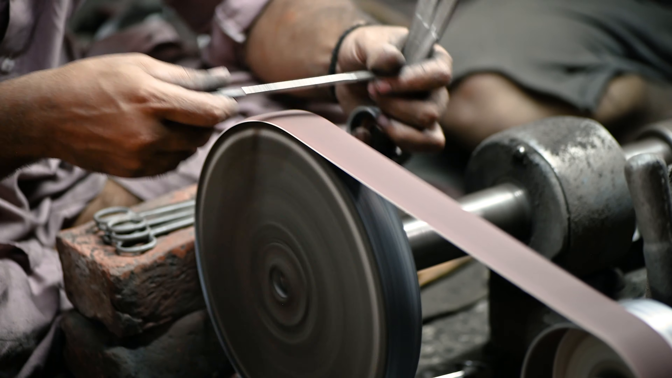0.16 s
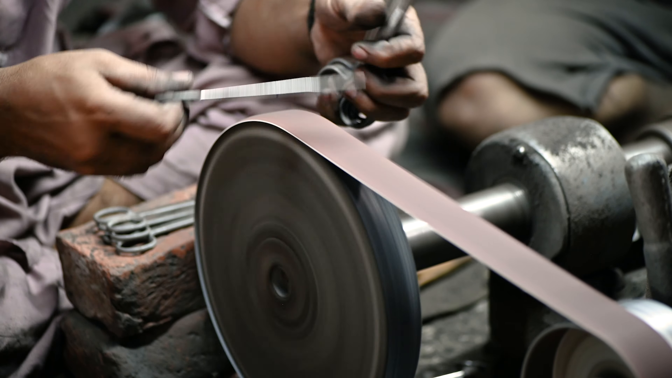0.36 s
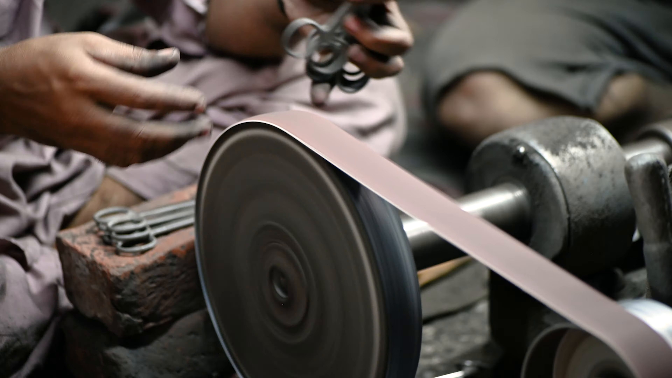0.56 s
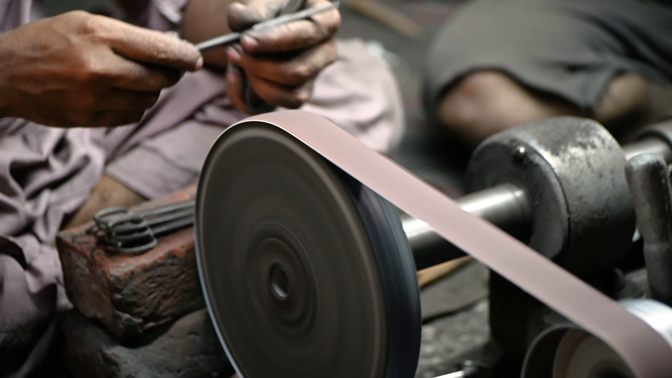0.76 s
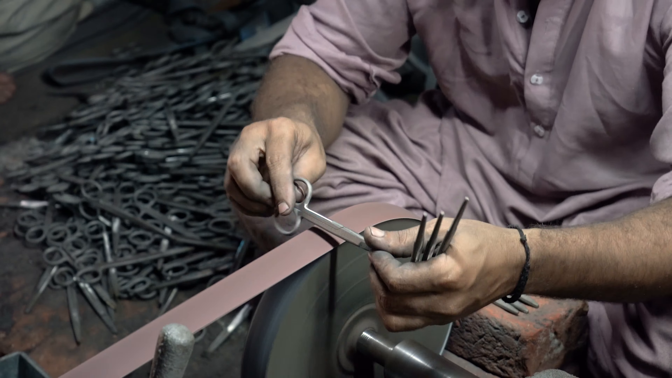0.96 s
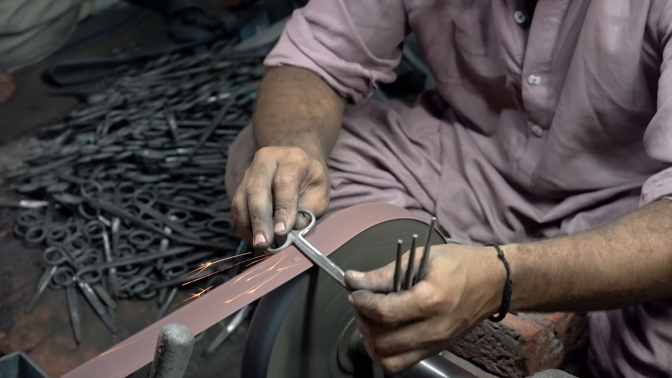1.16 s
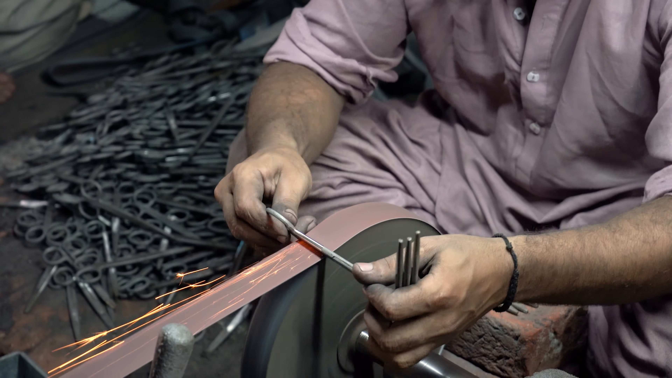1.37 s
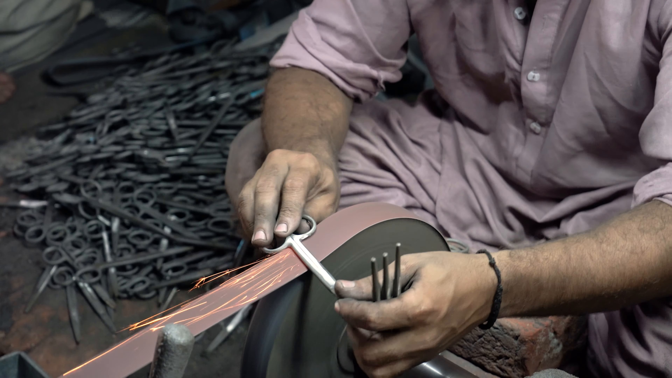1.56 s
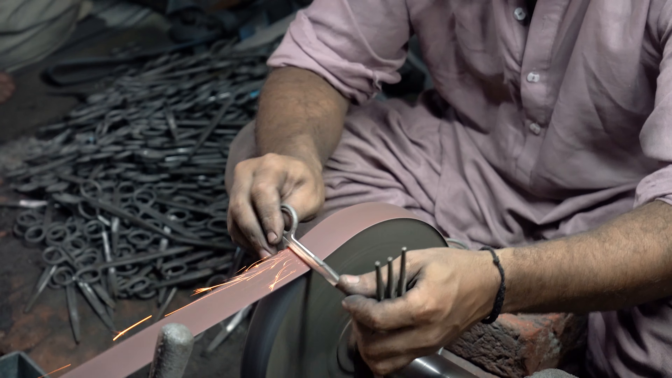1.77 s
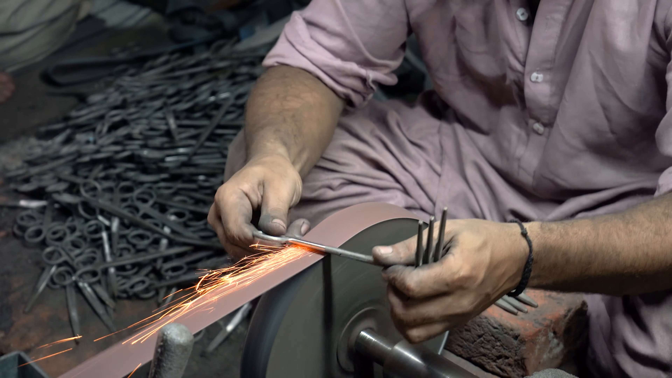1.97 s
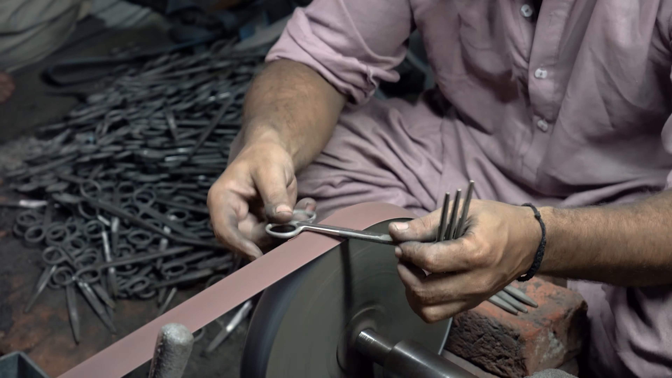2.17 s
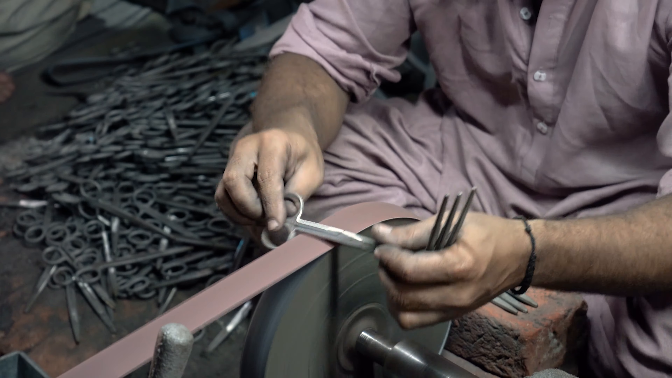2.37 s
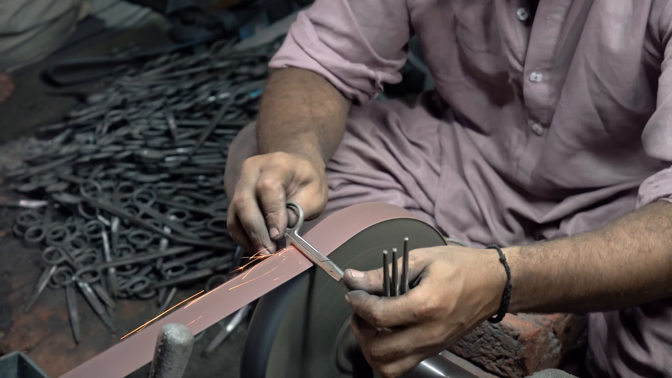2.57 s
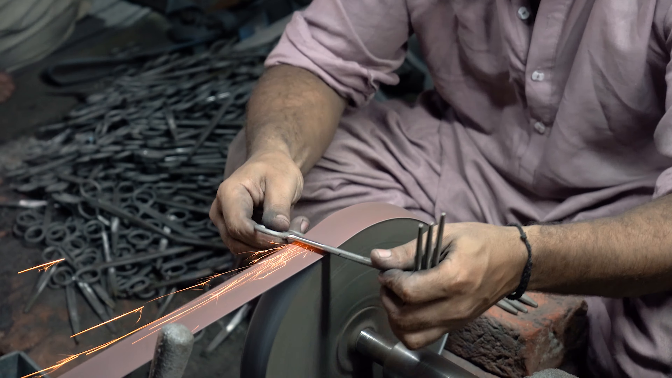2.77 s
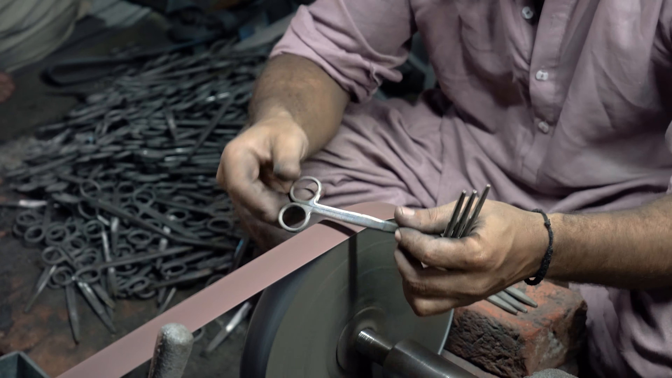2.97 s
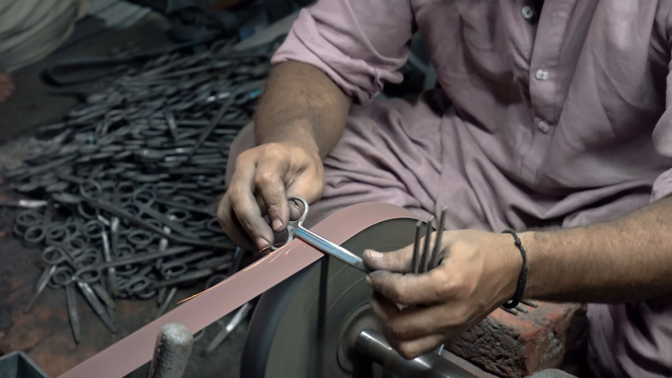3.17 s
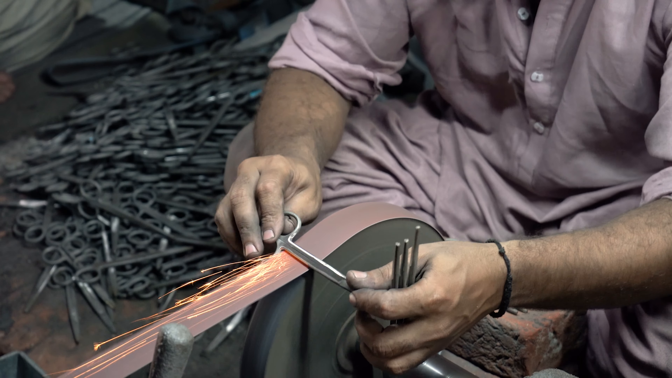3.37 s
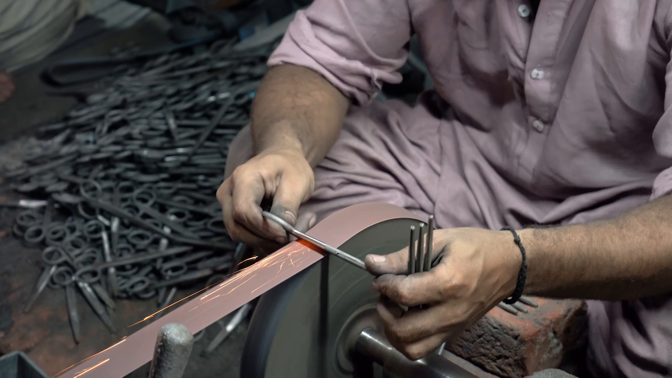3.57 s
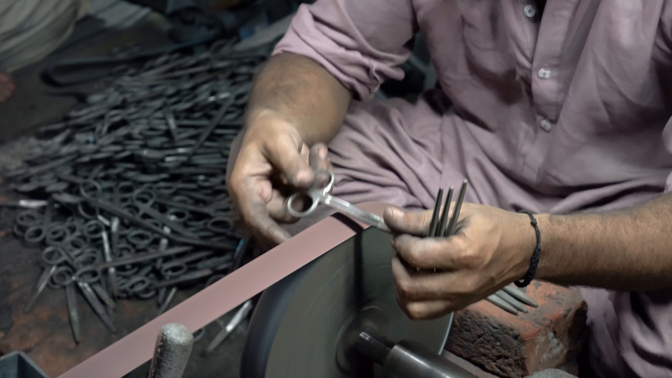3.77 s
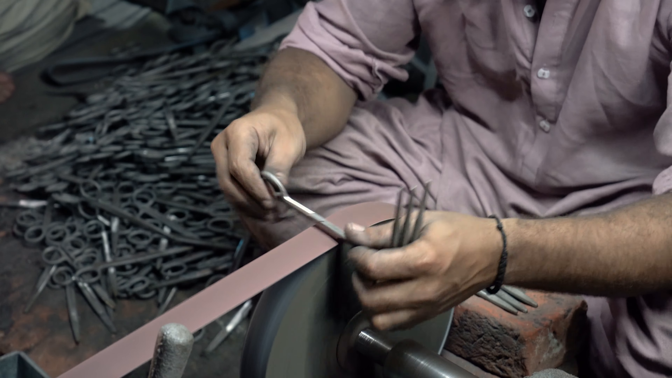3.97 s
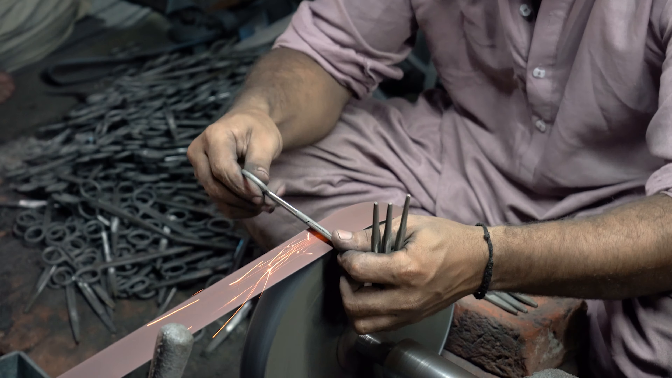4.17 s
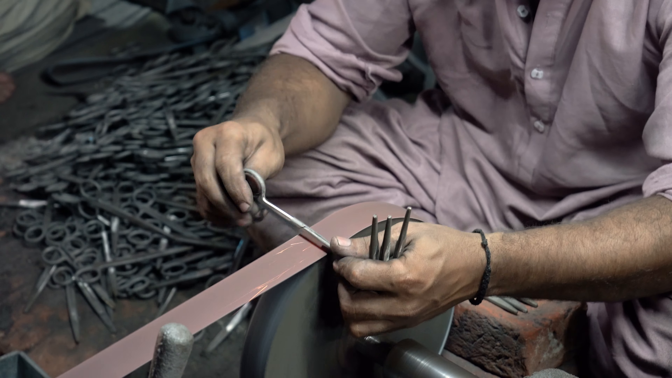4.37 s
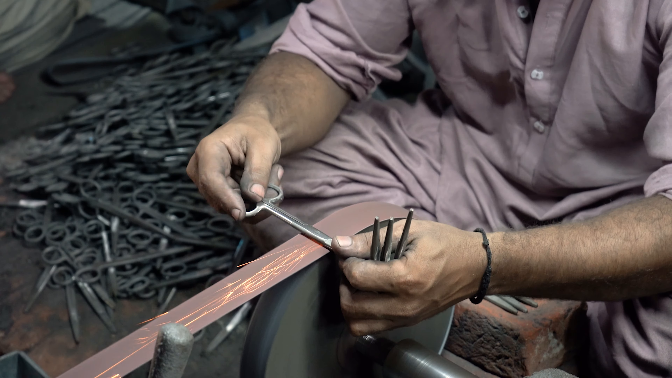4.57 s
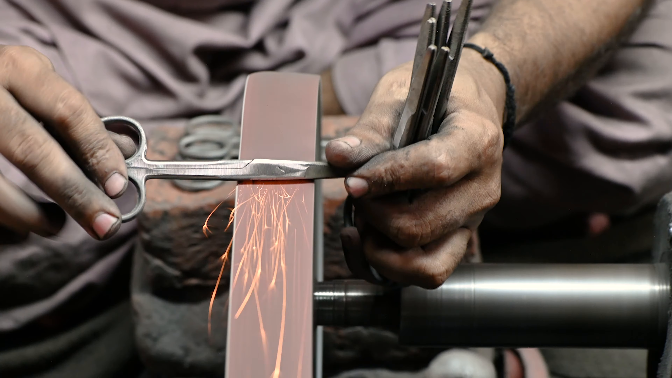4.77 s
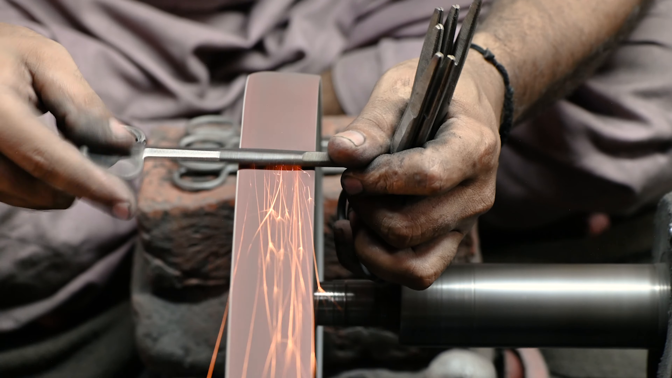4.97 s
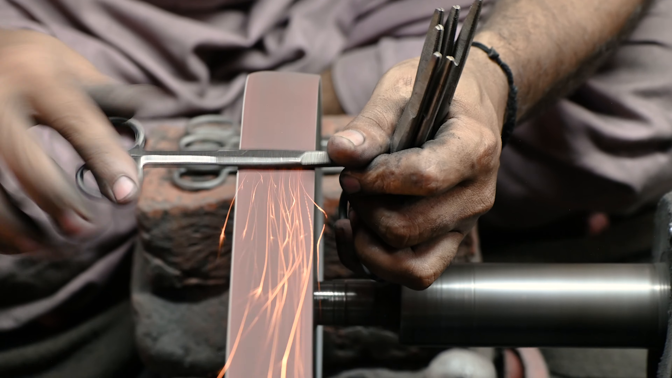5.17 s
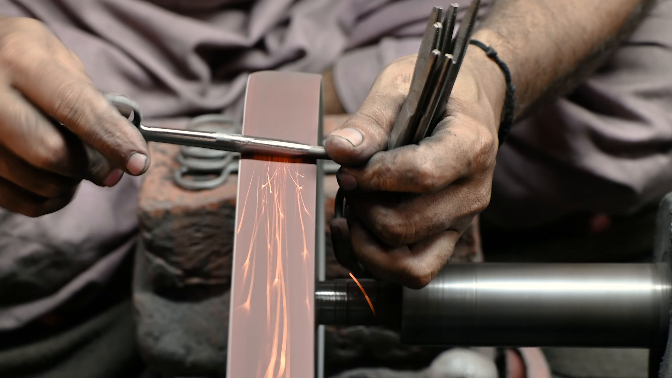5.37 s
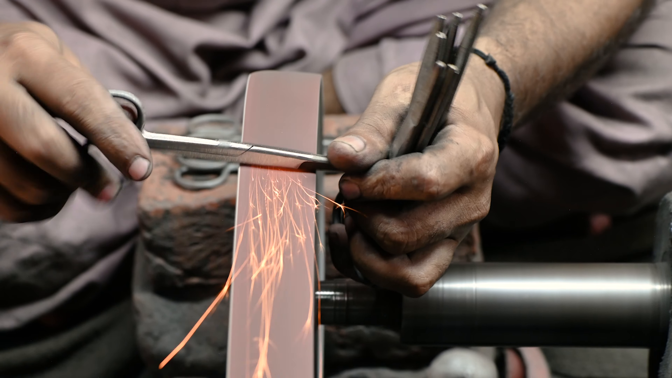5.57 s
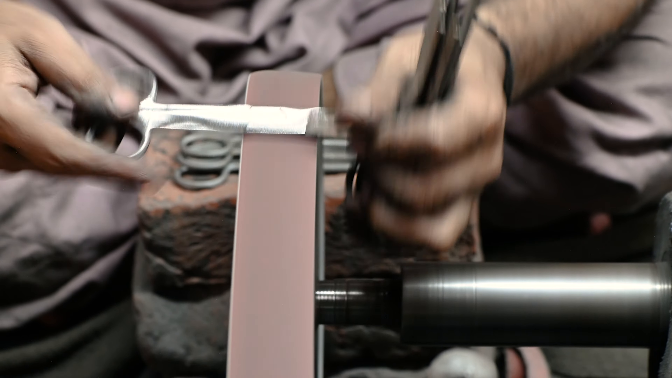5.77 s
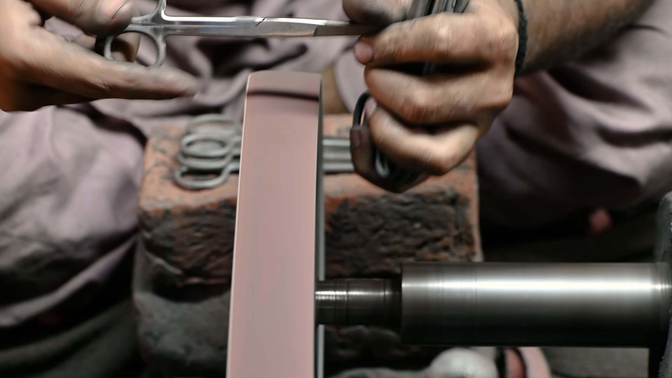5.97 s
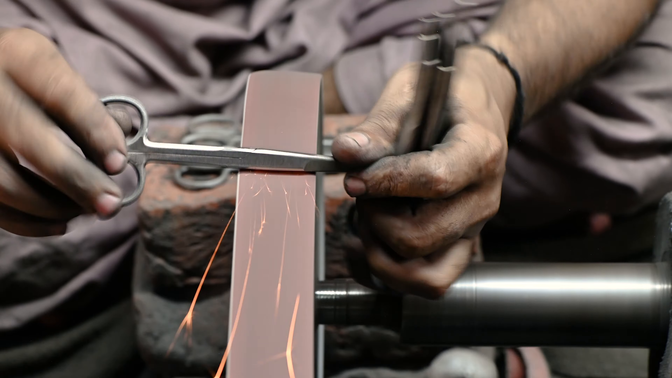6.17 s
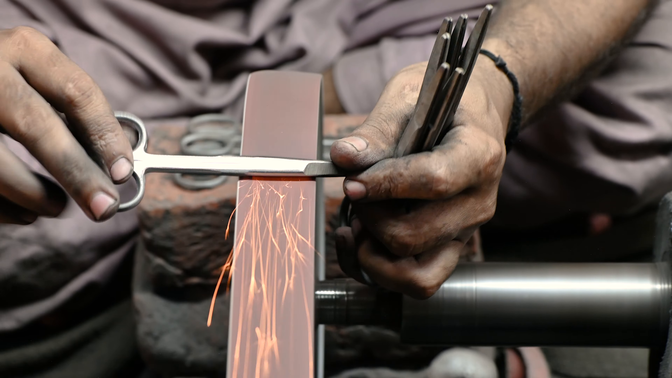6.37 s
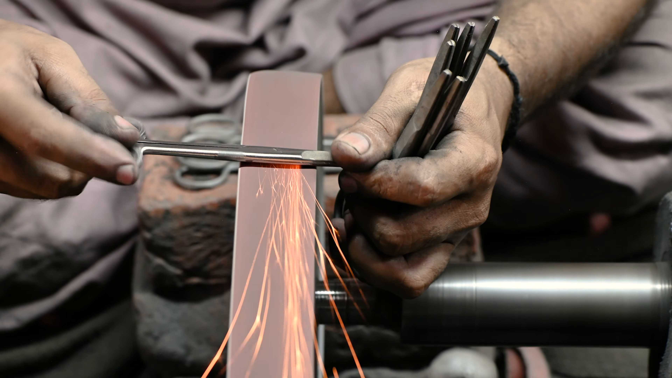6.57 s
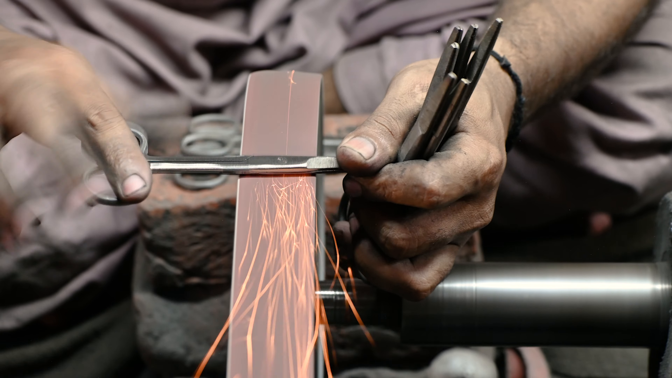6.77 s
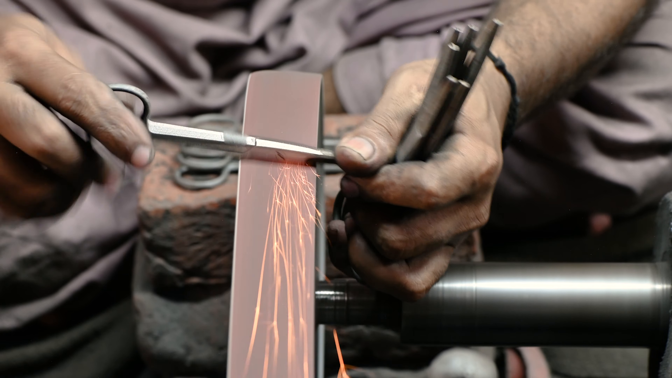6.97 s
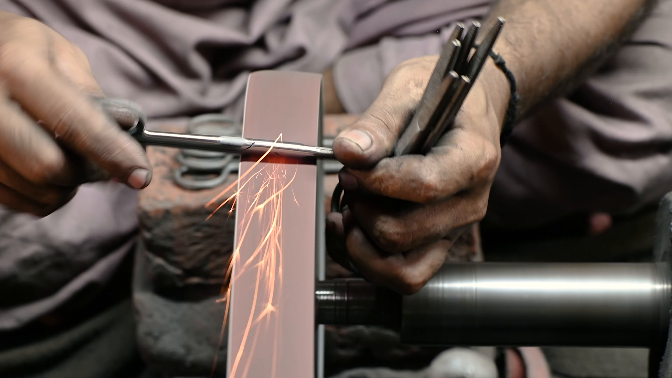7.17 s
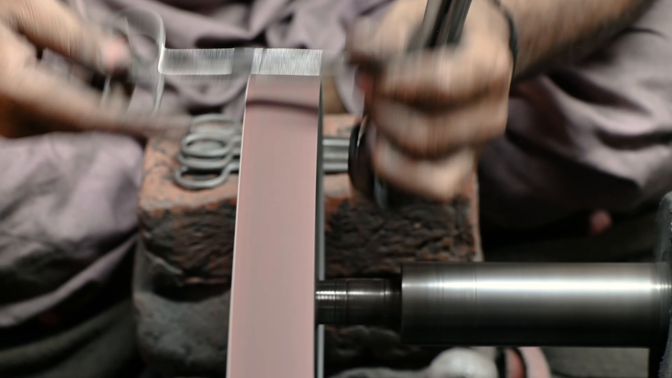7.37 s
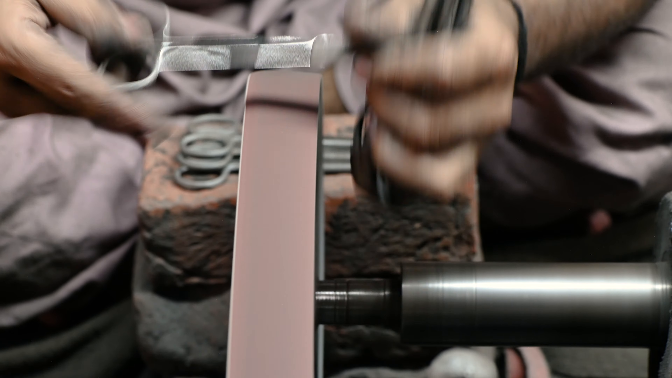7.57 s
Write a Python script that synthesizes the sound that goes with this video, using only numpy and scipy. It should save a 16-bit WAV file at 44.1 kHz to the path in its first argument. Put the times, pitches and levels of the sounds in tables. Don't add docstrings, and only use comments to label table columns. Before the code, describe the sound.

Scissor blades rasp harshly on a fast grinding belt, stroke after stroke, after metal pieces clatter and clink, over droning, whining workshop machinery.

```python
import sys
import numpy as np
from scipy import signal
from scipy.fft import rfft, irfft, next_fast_len
from scipy.io import wavfile
from scipy.ndimage import uniform_filter1d, map_coordinates

SR = 44100
rng = np.random.default_rng(int(sys.argv[2]) if len(sys.argv) > 2 else 0)


def inscribe(sig):
    pcm = np.round(np.clip(np.atleast_2d(sig).T, -1, 1) * 32767)
    wavfile.write(sys.argv[1], SR, pcm.astype(np.int16))


def volts(x):
    e = np.asarray(x, float) / 20
    return 10 ** e


N = 336042
WHEEL_HZ = 25.6

# time in seconds, half length in seconds,
# change of pressure in dB, change of the tip's sizzle on the belt in dB.
GRIPS = [(1.47, 0.088, -0.5, -1), (1.72, 0.088, -4.5, -2), (2.005, 0.061, 3, -4), (2.622, 0.07, 2, -2),
         (3.677, 0.098, 2, 1), (4.37, .025, -4, 1), (4.44, 0.055, 0.5, -1), (4.647, 0.032, -2.5, -4),
         (4.75, 0.068, -1.5, -5), (4.88, .04, 0.5, -1), (5.0, 0.16, -0.5, -2), (5.85, 0.25, -0.5, 2),
         (6.22, .04, 1, 0), (6.49, 0.081, -2, 1), (6.603, .025, -2.5, 0), (6.91, .05, 1.5, -1)]
# time in seconds, half length in seconds, dip in dB.
SPLICE = (.93, 0.012, -7)


def pressure():
    # touch in seconds, lift in seconds, full rasp in dB,
    # build-up in seconds, ease-off in seconds.
    strokes = [(1.094, 2.29, -51, 0.11, 0.14), (2.428, 3.0, -51, 0.14, 0.045),
               (3.164, 3.848, -52, 0.043, 0.062), (4.03, 5.379, -52, 0.042, 0.038),
               (5.64, 5.671, -46, .05, .003), (5.661, 7.195, -52.5, 0.034, 0.025),
               (7.529, 7.9, -54, 0.0071, .04)]
    touch_s, leave_s = 0.0064, 0.032
    light_db, last_db = -10, -17.5
    gain, into = np.zeros(N), np.zeros(N)
    soft_db = bumps([row[:3] for row in GRIPS])
    for touch, lift, db, build, ease in strokes:
        age, left, contact = gate(touch, lift, touch_s, leave_s)
        touching = contact > 0
        soft_db = soft_db + touching * (light_db * np.exp(-age / build) + last_db * np.exp(-left / ease))
        gain = gain + volts(db) * contact
        into = into + touching * age
    return gain * volts(soft_db), soft_db, into


def rasp(gain, soft_db, into):
    # frequency in Hz, level in dB per Hz.
    grit_colour = [(1500, -120), (2800, -7), (4000, -4.5), (5100, -0.5), (6000, -1), (6600, 0), (9600, 3),
                   (11500, 3), (15000, 3.5), (17000, -6.5)]
    # frequency in Hz, width in Hz, level in dB.
    blade_modes = [(5280, 98, -12.5), (5610, 49, -29), (6420, 120, 3), (7540, 91, -1.5), (9100, 490, -2.5),
                   (9970, 87, -1.5), (14500, 90, -2)]
    # frequency in Hz, left-right likeness from 0 to 1.
    rasp_alike = [(3000, .1), (5200, 0.39), (6100, 0.27), (7000, 0.63), (8800, 0.41), (11500, 0.34),
                  (14000, 0.5), (16000, 0.45)]
    # frequency in Hz, width in Hz, level in dB re rasp.
    blade_song = [(5220, 50, -12), (5620, 50, -19)]
    # (time in seconds, half length in seconds, rise in dB).
    tip_song = (15500, 160, -27, (4.7, .3, 12))
    # time in seconds, half length in seconds, extra sizzle in dB.
    flare = (4.725, .05, 10.5)

    wear_db = 0.12 * (np.arange(N) / SR - 4)
    body_db = -1.93 - 0.5 * soft_db + wear_db
    tip_db = bumps([(s, half, tip) for s, half, _, tip in GRIPS])
    sizzle_db = 0.6 + 1.5 * into + tip_db + bumps([flare])

    colour = lambda hz: volts(along(grit_colour, hz)) * ringing(blade_modes, hz)
    grit = rush(colour, rasp_alike, patchy_db=0.55, grain_db=1.5)
    body, edge, sizzle = split(grit, low_hz=7440, high_hz=11940)
    mix = volts(body_db) * unit(body) + unit(edge) + volts(sizzle_db) * unit(sizzle)

    for hz, width, db in blade_song:
        song_db = db + 1.5 * (into - 0.5) + 1.5 * wobble(6)
        mix += volts(song_db) * singing(hz, width, apart=0.37)
    tip_hz, tip_width, whistle_db, swell = tip_song
    mix += volts(whistle_db + bumps([swell])) * singing(tip_hz, tip_width, apart=0.5)

    turn = 2 * np.pi * np.cumsum(WHEEL_HZ * (1 + 0.018 * wobble(1.88))) / SR
    throb_db = 0.51 * np.sin(turn) + 0.27 * np.sin(3 * turn) + 0.5 * wobble(18)
    return gain * volts(throb_db + 0.28) * mix


def groan(gain):
    # frequency in Hz, level in dB per Hz.
    groan_colour = [(80, -120), (130, -18), (170, -5), (210, 0), (280, -6), (500, -120)]
    frame = filtered(rng.standard_normal(N), lambda hz: volts(along(groan_colour, hz)))
    load = uniform_filter1d(gain, size=4410)
    return volts(-35 + 2.8 * wobble(2.22)) * load * unit(frame)


def handling():
    # frequency in Hz, level in dB per Hz.
    heap_colour = [(120, -120), (200, -40), (350, -9), (600, 0), (1000, -1), (1900, -4), (2900, -1),
                   (3800, -7), (6000, -20), (9000, -60)]
    jingle_colour = [(800, -120), (3000, -30), (5000, 2), (7000, 3), (10000, -3), (14000, -2),
                     (15700, -11.5)]
    # frequency in Hz, level in dB.
    steel_colour = [(1500, -120), (5000, -33), (7000, -10), (10000, -5), (12000, -8), (14600, -3),
                    (16000, -8)]
    # time in seconds, peak in dB, decay by 60 dB in seconds.
    clink_rows = [(0.4494, -41, 0.062), (0.4674, -41.5, 0.05), (0.6928, -38, 0.046), (0.7033, -36, 0.11),
                  (0.7344, -44, 0.05)]

    drop_s, slide_s, land_s, settle_s = 0.466, 0.14, 0.0032, 0.032
    gated = gate(drop_s, drop_s + slide_s + 2 * settle_s, land_s, settle_s)
    age, _, slide = (curve[:SR] for curve in gated)
    heap_db = -49 - 25 * age + 1.2 * wobble(90)[:SR]
    jingle_db = -53 - 67 * age + 2.2 * wobble(67.5)[:SR]

    heap = rush(lambda hz: volts(along(heap_colour, hz)), [(300, 0.9), (2000, 0.3)],
                patchy_db=0.7, grain_db=3, size=SR)
    jingle = rush(lambda hz: volts(along(jingle_colour, hz)), [(9000, 0.3)],
                  patchy_db=1.5, grain_db=3, size=SR)
    steel = rush(lambda hz: volts(along(steel_colour, hz)), [(9000, 0.4)],
                 patchy_db=1.5, grain_db=2.5, size=SR)

    t, clinks = np.arange(SR) / SR, np.zeros(SR)
    for s, db, t60 in clink_rows:
        since = np.maximum(t - s, 0)
        clinks += volts(db - 7 - 60 * since / max(t60, 0.005)) * (1 - np.exp(-since / 0.002))
    falling = slide * (volts(heap_db) * unit(heap) + volts(jingle_db) * unit(jingle))
    first = falling + clinks * unit(steel)
    return np.pad(first, [(0, 0), (0, N - SR)])


def shed(x):
    # frequency in Hz, decay by 60 dB in seconds.
    decay = [(300, 0.17), (4000, 1), (15000, 0.17)]
    hz, t, z = signal.stft(rng.standard_normal((2, SR // 2)), SR, nperseg=256)
    fading = z * volts(-60 * t / along(decay, hz)[:, None])
    tail = signal.istft(fading, SR, nperseg=256)[1]
    return signal.fftconvolve(x, tail / np.linalg.norm(tail[0]), axes=1)[:, :N]


def whines(load):
    # time in seconds, half length in seconds, change in dB.
    chirps = [(.15, 0.17, -7), (.85, .1, -6), (.6, .2, -0.5), (1.06, .13, 4.5), (2.32, .05, -9),
              (4.0, 0.28, 4), (4.63, 0.17, 5.5), (5.04, 0.05, 7), (5.26, 0.09, 8.5), (5.48, 0.064, 7.5),
              (5.85, .2, 2.5), (6.42, .12, -5), (6.8, .15, 1), (7.32, .04, 7), (7.58, .06, 6)]
    # time in seconds, half length in seconds, rise in dB.
    slips = [(.3, 0.37, 12), (.56, 0.065, 8.7), (3.5, 0.14, 11), (5.1, 0.17, 5.7), (5.5, .1, 6.2),
             (7.06, .08, 9)]
    turns = np.cumsum(WHEEL_HZ * (1 + 0.1 * wobble(6))) / SR
    flutter_db = 3 * np.sin(2 * np.pi * turns) + 2.5 * wobble(90)
    whine_db = -62 - 4.5 * load + bumps(chirps) + flutter_db
    squeal_db = -69.5 + bumps(slips) + 3 * wobble(40)
    whine = volts(whine_db) * singing(3648, width=55, apart=0.4)
    return whine + volts(squeal_db) * singing(2915, width=90, apart=0.8)


def motor():
    tooth_hz = (80.8, 79.4)
    # multiple of the tooth rate, level in dB.
    teeth = [(2, -27), (3, -16), (4, -12), (5, -6), (7, -6), (8, -3), (9, -5), (10, -7), (14, -11),
             (17, -0.5), (20, -6)]
    # time in seconds, half length in seconds, change in dB.
    lulls = [(.3, .4, 0), (.9, 0.088, -7), (2.9, 0.42, -18), (4.4, 0.17, -14), (6.5, 0.52, -11),
             (7.55, 0.37, -20)]
    rate = np.where(np.arange(N) / SR < SPLICE[0], *tooth_hz)
    hum_db = -68 + bumps(lulls) + 2.5 * wobble(8)
    hum = volts(hum_db) * singing(12 * rate, width=11, apart=0.5)
    for k, db in teeth:
        hum += volts(db - 74 + 3 * wobble(2.5)) * singing(k * rate, width=7 + k, apart=0.03 * k)
    return hum


def shop():
    # frequency in Hz, level in dB per Hz; first the drone, then the idle belts' hiss.
    drone_colour = [(15, -85), (25, -74), (300, -17.5), (333, -12.5), (363, -15), (421, -13.5), (701, -10),
                    (964, -8), (1610, -4.5), (3600, 4.5), (4000, -13), (5200, -44), (8800, -120)]
    hiss_colour = [(1000, -120), (2800, -60), (3400, 2.5), (3900, 3), (4400, 0.5), (6000, -1.5), (9800, -4),
                   (10600, -8), (15500, -11.5), (17000, -22)]
    # frequency in Hz, width in Hz, level in dB over the drone.
    frame_modes = [(2270, 27, 1), (2457, 9, 8.5), (2620, 17, 3), (2880, 340, 0)]
    # frequency in Hz, left-right likeness from 0 to 1.
    shop_alike = [(60, 0.81), (150, .995), (380, 1), (950, 0.62), (2380, 0.16), (4000, 0.08)]
    # time in seconds, half length in seconds, rise in dB.
    surges = [(3.5, 0.12, 1.5), (7.12, 0.1, 3)]
    drone_db = -59.5 + bumps(surges) + bumps([SPLICE]) + 0.054 * wobble(2.6)
    belts_db = -51.5 + bumps([SPLICE]) - 0.2 * np.arange(N) / SR + 0.22 * wobble(7.6)
    idle_db = -54 + 0.5 * wobble(3)
    colour = lambda hz: volts(along(drone_colour, hz)) * ringing(frame_modes, hz)
    air = rush(colour, shop_alike, patchy_db=0.82, grain_db=-0.44)
    drone, belts, _ = split(air, low_hz=1536, high_hz=3010)
    hiss = rush(lambda hz: volts(along(hiss_colour, hz)), [(4000, 0.023), (15000, 0.055)],
                patchy_db=0.5, grain_db=-0.5)
    return volts(drone_db) * unit(drone) + volts(belts_db) * unit(belts) + volts(idle_db) * unit(hiss)


def rush(colour, alike, patchy_db, grain_db, size=N):
    grains = rng.standard_normal((2, size)) * volts(grain_db * np.minimum(rng.exponential(size=size), 4))
    z = signal.stft(grains, nperseg=512)[2]
    field = uniform_filter1d(rng.standard_normal(z.shape[1:]), size=8, axis=0)
    field = uniform_filter1d(field, size=12, axis=1)
    pair = signal.istft(z * volts(patchy_db * unit(field)), nperseg=512)[1][:, :size]
    turn = lambda hz: np.arccos(np.clip(along(alike, hz), -1, 1)) / 2
    mid, side = filtered(pair, lambda hz: colour(hz) * [np.cos(turn(hz)), np.sin(turn(hz))])
    return np.array([mid + side, mid - side])


def singing(hz, width, apart):
    phase = 2 * np.pi * np.cumsum(hz + width / 2 * wobble(2 * width)) / SR
    lead = apart * wobble(12)
    return np.sqrt(2) * np.sin([phase + lead, phase - lead])


def ringing(modes, hz):
    power = 1
    for centre, width, db in modes:
        power = power + volts(2 * db) / (1 + (2 * (hz - centre) / width) ** 2)
    return np.sqrt(power)


def split(x, low_hz, high_hz):
    under = lambda edge: filtered(x, lambda hz: 1 / (1 + (hz / edge) ** 8))
    low, most = under(low_hz), under(high_hz)
    return low, most - low, x - most


def filtered(x, response):
    m = next_fast_len(x.shape[-1] + 8192, real=True)
    spectrum = rfft(x, m) * response(np.fft.rfftfreq(m, 1 / SR))
    return irfft(spectrum, m)[..., :x.shape[-1]]


def gate(start, stop, rise, fall):
    t = np.arange(N) / SR
    age, left = np.maximum(t - start, 0), np.maximum(stop - t, 0)
    return age, left, (1 - np.exp(-age / rise)) * (1 - np.exp(-(left / fall) ** 2))


def bumps(rows):
    s, half, db = np.transpose(rows)
    coarse = np.arange(0, N + 64, 64)
    curve = np.exp(-((coarse[:, None] / SR - s) / half) ** 2) @ db
    return np.interp(np.arange(N), coarse, curve)


def wobble(rate):
    coarse = np.arange(0, N + 64, 64)
    knots = rng.standard_normal(int(N * rate / SR) + 4)
    return np.interp(np.arange(N), coarse, map_coordinates(knots, [coarse * rate / SR]))


def along(points, hz):
    f, v = np.transpose(points)
    return np.interp(np.log(hz + 1), np.log(f + 1), v)


def unit(x):
    return x / np.sqrt(np.mean(x ** 2) + 1e-20)


def scene():
    gain, soft_db, into = pressure()
    grinding = rasp(gain, soft_db, into)
    hands = handling()
    near = grinding + hands + groan(gain)
    echo = shed(volts(-7) * grinding + volts(-7.5) * hands)
    return near + echo + whines(gain / gain.max()) + motor() + shop()


def band_limit(x):
    return signal.sosfilt(signal.butter(12, 17070, fs=SR, output="sos"), x)


def record(dry):
    # frequency in Hz, left minus right in dB, left lead in radians; the bass agrees.
    MATCHED = [(350, .4, 0)]
    port_rows = MATCHED + [(1000, 1.5, -0.25), (1910, -1.3, -0.6), (2840, 0, -0.048), (3550, 2.5, 0.43),
                 (5070, -1, -0.38), (6300, 1.0, -0.8), (7900, 0.0, 1.0), (9200, -5.0, 0.42),
                 (10400, -2.0, .9), (11700, 1, .3), (13800, -2.0, .2), (15500, 9, 0.36)]
    top_hz = 15770
    hz0, tilt_db, lead = np.transpose(port_rows)
    half = lambda hz: volts(np.interp(hz, hz0, tilt_db) / 2) * np.exp(0.5j * np.interp(hz, hz0, lead))
    ports = filtered(dry, lambda hz: [half(hz), 1 / half(hz)] * (hz < top_hz)[None])
    return band_limit(ports)


dry = scene()
out = record(dry)
inscribe(out)
```